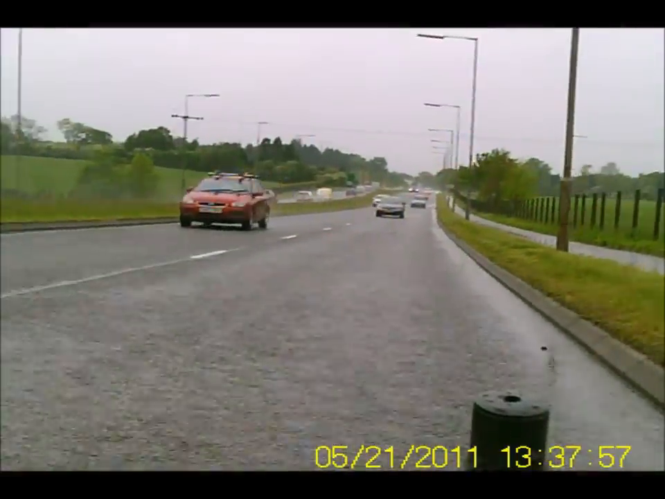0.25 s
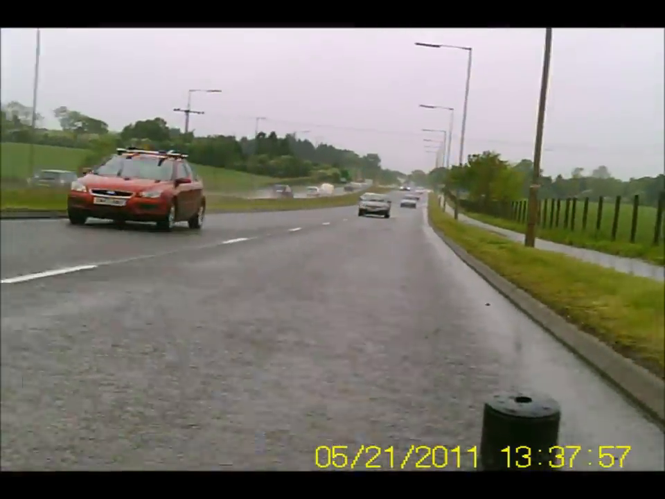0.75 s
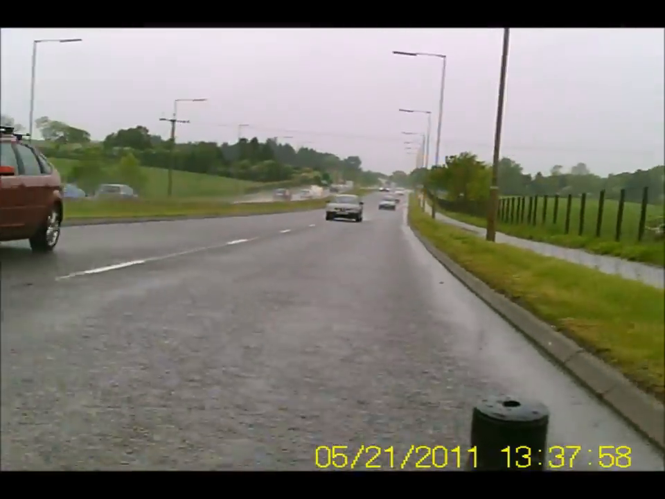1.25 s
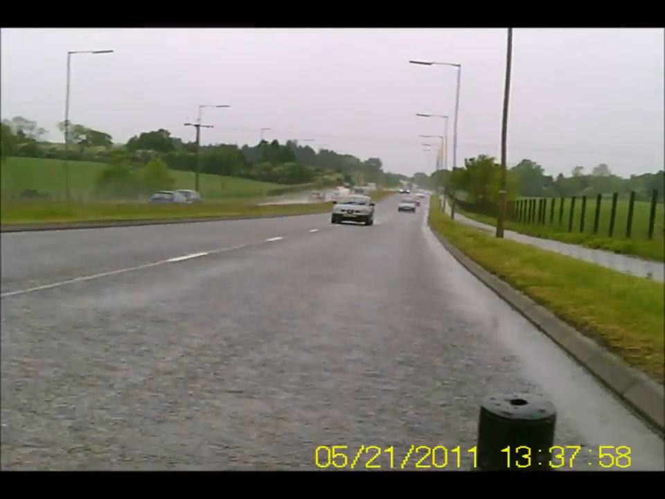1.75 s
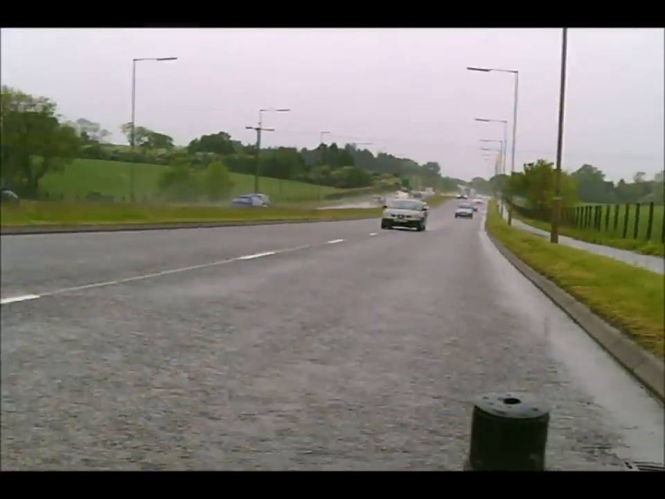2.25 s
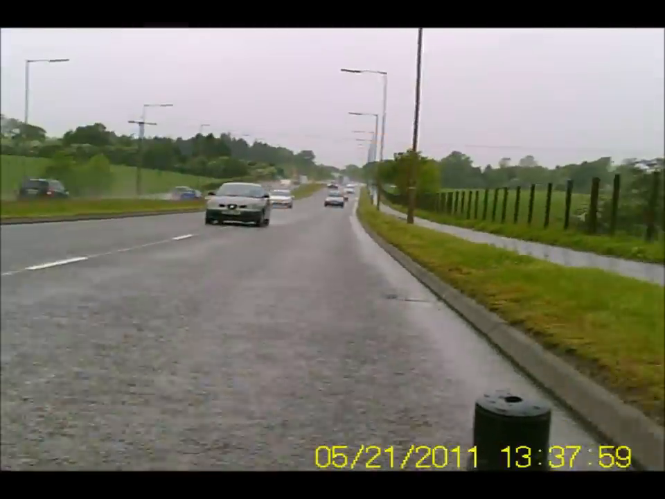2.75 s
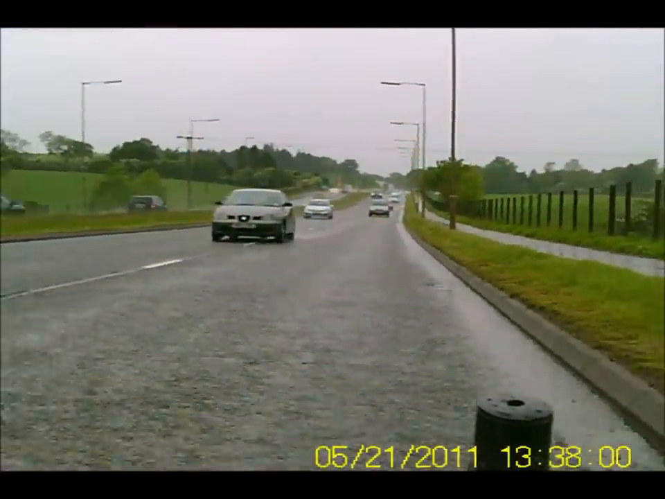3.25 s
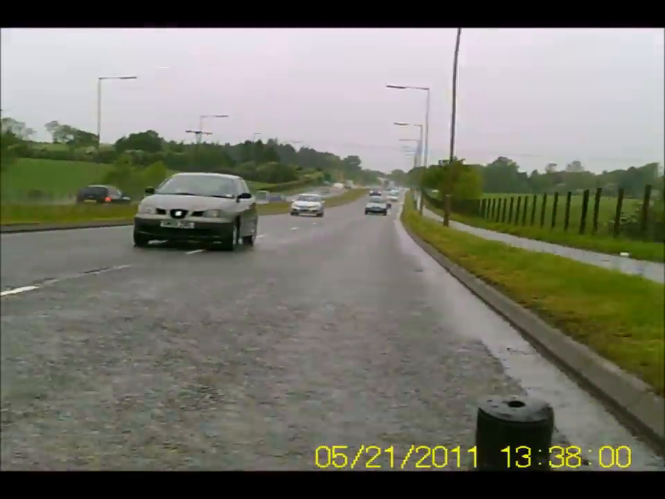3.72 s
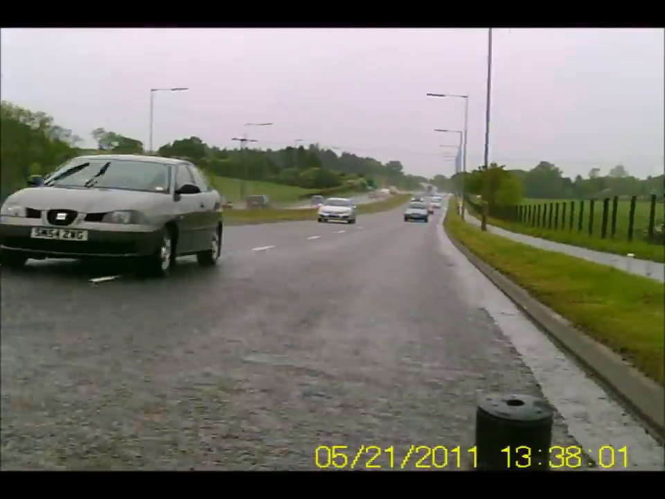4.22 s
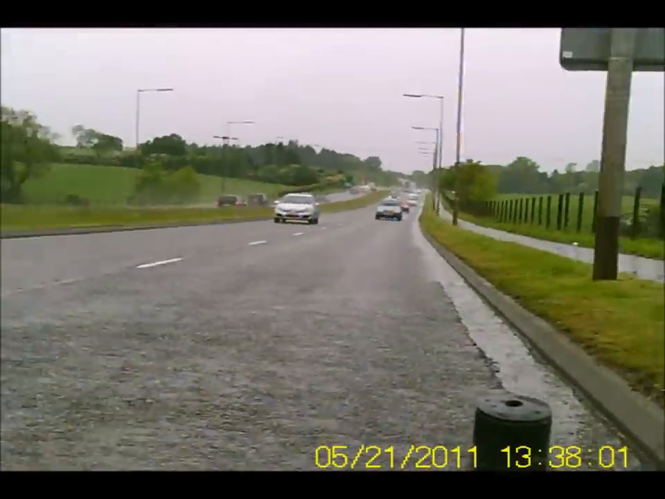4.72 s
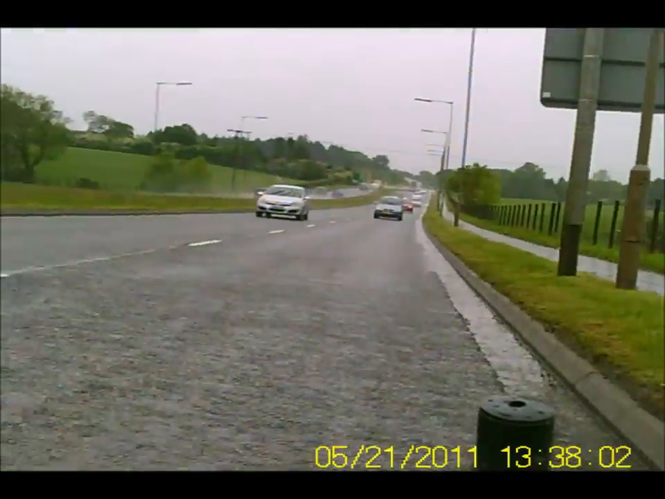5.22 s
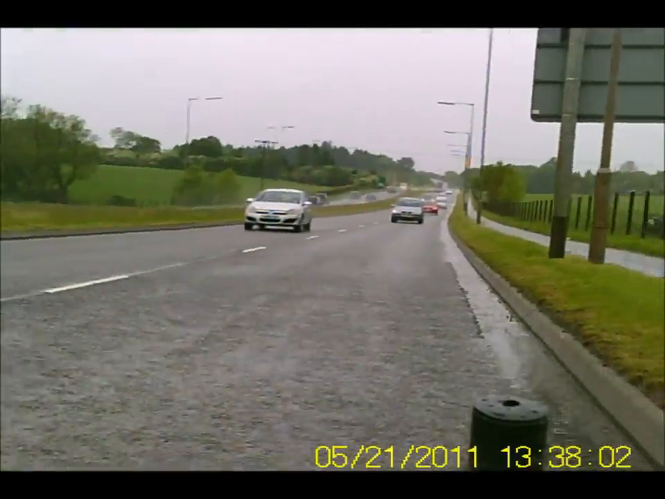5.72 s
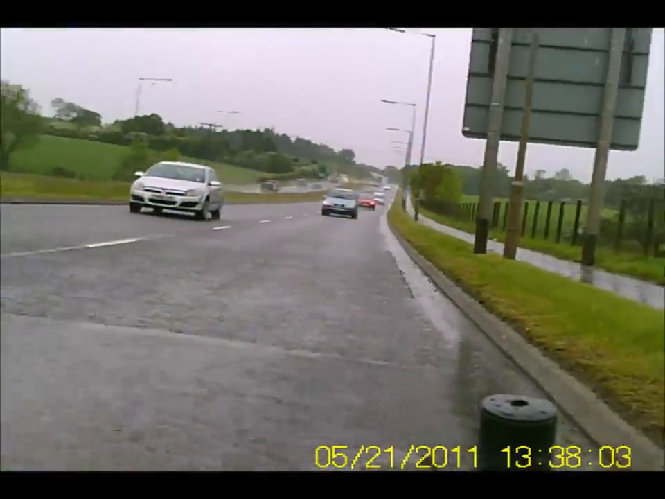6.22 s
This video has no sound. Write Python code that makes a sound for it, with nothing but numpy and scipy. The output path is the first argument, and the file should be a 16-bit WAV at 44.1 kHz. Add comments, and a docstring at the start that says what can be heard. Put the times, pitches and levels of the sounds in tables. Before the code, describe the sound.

Wind buffets and thumps a small camera microphone on a bicycle, while its housing rattles over rough asphalt and cars pass with wet tyre roar.

```python
"""Wind buffets and rushes over the microphone of a small camera that rides on a bicycle along a wet main road.
The camera knocks in its mount: each jolt gives a low push and a dull clunk, and rings the plastic housing's modes.
The housing chatters on the asphalt grain, the clamp snaps twice over, and a few drops plop as ringing bubbles.
Oncoming cars pass as bands of tyre roar and spray hiss that swell with nearness; fine wet hiss swishes
in short bursts of droplet grains, and the electronics whine faintly in steady tones."""
import sys
import numpy as np
from scipy import signal
from scipy.fft import rfft, irfft, next_fast_len
from scipy.io import wavfile
from scipy.ndimage import uniform_filter1d, map_coordinates

SR = 44100
rng = np.random.default_rng(int(sys.argv[2]) if len(sys.argv) > 2 else 0)


def store_wav(level_fs):
    """Save 16-bit WAV to argv[1]."""
    pcm = np.round(np.clip(np.atleast_2d(level_fs), -1, 1) * 32767)
    wavfile.write(sys.argv[1], SR, pcm.T.astype(np.int16))


N = 285327

# edges between the clunk, hollow, middle and sharp parts of a knock, then the top edge: [f/Hz]
REGISTER_EDGES_HZ = [300, 1500, 3700, 7300, 10800]
CLUNK_TOP_HZ = 833  # the mount is too soft to pass more
# stretches of rough asphalt: [start t/s, end t/s, small knocks per s, rise of the chatter level/dB]
ROUGH_STRETCHES = [(1.156, 2.647, 4, 0), (3.252, 4.884, 8.7, 2.5)]


def amp(db):
    """Decibels to gain."""
    return 10 ** (np.asarray(db) / 20)


def unit(x):
    """x scaled to rms 1."""
    return x / np.sqrt(np.mean(x ** 2) + 1e-20)


def curves(rows):
    """One value per sample for each column after the time."""
    knot_s, *columns = np.transpose(rows)
    return [np.interp(np.arange(N) / SR, knot_s, column) for column in columns]


def wobble(rate):
    """A smooth random curve around 0, rate knots a second."""
    knots = rng.standard_normal(int(N * rate / SR) + 4)
    return map_coordinates(knots, [np.arange(N) * rate / SR])


def bell(s, half_s):
    """A bell-shaped rise and fall around time s, top 1."""
    return np.exp(-.5 * ((np.arange(N) / SR - s) / half_s) ** 2)


def filtered(x, response):
    """x times a response of frequency."""
    m = next_fast_len(N + SR // 2)
    return irfft(rfft(x, m) * response(np.fft.rfftfreq(m, 1 / SR)), m)[:N]


def band(x, low_hz, high_hz):
    """The part of x between two frequencies, rms 1."""
    sos = signal.butter(3, [low_hz, high_hz], "bandpass", fs=SR, output="sos")
    return unit(signal.sosfilt(sos, x))


def noise(spectrum):
    """Noise of rms 1 with the colour of [f/Hz, level/dB] points."""
    f, db = np.transpose(spectrum)

    def colour(hz):
        return amp(np.interp(np.log(hz + 1), np.log(f), db))

    return unit(filtered(rng.standard_normal(N), colour))


def grains(rate, spread_db):
    """Tiny impacts at random times, most weak and a few strong, rms 1."""
    hit = rng.random(N) < rate / SR
    size = amp(spread_db * np.minimum(rng.exponential(size=N), np.pi))
    return unit(hit * size * rng.choice([-1, 1], N))


def add(track, s, sound):
    """Mix a sound into the track from time s."""
    part = track[max(round(s * SR), 0):][:len(sound)]
    part += sound[:len(part)]


def swells(rows, source):
    """Bands of the source that rise and fall in bell shapes."""
    track = np.zeros(N)
    for s, half_s, db, centre_hz, octaves in rows:
        def bell_band(hz):
            return np.exp(-.5 * (np.log2((hz + 1) / centre_hz) / octaves) ** 2)

        track += amp(db) * bell(s, half_s) * unit(filtered(source, bell_band))
    return track


def push(t, half_s):
    """One dip of pressure in the middle of the times t, depth 1, with an overshoot on either side."""
    u = (t - t.mean()) / half_s
    return (2 * u * u - 1) * np.exp(-u * u)


def contact(t, rise_s):
    """Two rough surfaces touch: a burst of noise that swells and dies at once."""
    return rng.standard_normal(len(t)) * t / rise_s * np.exp(1 - t / rise_s)


def chatter(t, rise_s):
    """A contact that bounces once, more weakly, after a random flight."""
    shortest_s, longest_s, bounce_db = 0.0015, 0.004, -11
    flight = round(rng.uniform(shortest_s, longest_s) * SR)
    bounce = np.pad(contact(t, rise_s), (flight, 0))[:len(t)]
    return contact(t, rise_s) + amp(bounce_db) * bounce


def housing(hz, tilt_db=0):
    """Response of the plastic shell: a sum of resonant modes, tilted by tilt_db per octave."""
    # modes of the shell: [f/Hz, width/Hz, level/dB before the tilt]
    modes = [(1941, 150, 7), (2910, 240, -1.5), (4490, 167, -1), (6530, 250, -5.5), (8360, 500, 2),
             (9850, 110, -14.5)]
    lowest_hz = modes[0][0]
    response = 0
    for centre, width, db in modes:
        gain = amp(db + tilt_db * np.log2(centre / lowest_hz))
        damping = 1j * hz * width
        response = response + gain * damping / (centre * centre - hz * hz + damping)
    return response


def struck(touch, crack_db):
    """The housing answers a contact with its modes, over the dry crack of the contact itself."""
    # the pitch of the modes shifts with the place of contact
    hz = np.fft.rfftfreq(len(touch), 1 / SR) * (1 + 0.015 * rng.standard_normal())
    return irfft(rfft(touch) * (housing(hz) + amp(crack_db)), len(touch))


def bumps():
    """The brief change in dB that bumps in the road give the rush; the tyre roar takes a share of it."""
    # the bicycle rides over a bump: [t/s, rise of the rush level/dB]
    bump_rows = [(0.647, 7), (0.693, 5), (0.835, -1), (1.151, 1.5), (1.94, 0.5), (2.275, 0.5), (3.28, 9),
                 (3.371, 10.5), (4.431, 13), (5.281, 7.5), (5.84, 7), (6.38, 6)]
    return sum(rise_db * bell(s, half_s=0.0078) for s, rise_db in bump_rows)


def roughness_db():
    """How much the asphalt under the wheels raises the chatter of the housing, with softened edges."""
    t, steps = np.arange(N) / SR, np.zeros(N)
    for start, end, _, rise_db in ROUGH_STRETCHES:
        steps += np.where((t > start) & (t < end), rise_db, 0.)
    return uniform_filter1d(steps, size=SR // 10)


def whine():
    """Thin steady tones and a faint hiss from the camera's circuits."""
    # tones of the electronics: [f/Hz, rms level/dB]
    tone_rows = [(3893, -99.5), (5600, -79.5), (6201, -87), (6800, -88), (7400, -79), (9600, -96)]
    # colour of the circuit hiss: [f/Hz, relative level/dB]
    circuit_colour = [(300, -0.5), (4000, 5), (7000, -0.5), (10000, -4), (11500, -28.5)]
    t, tones = np.arange(N) / SR, np.zeros(N)
    for hz, db in tone_rows:
        tones += np.sqrt(2) * amp(db) * np.sin(2 * np.pi * (hz * t + rng.random()))
    return tones + amp(-71.5) * noise(circuit_colour)


def drops(glide, life_s, attack_s):
    """A drop plops near the microphone: a tiny bubble rings for a few cycles while its pitch rises."""
    # plops: [t/s, level/dB before the envelope, starting f/Hz]
    plops = [(3.251, -30, 1040), (3.423, -22.5, 636), (3.859, -30, 820), (6.171, -29, 850)]
    track, t = np.zeros(N), np.arange(SR // 40) / SR
    decay = np.exp(-t / life_s)
    envelope = decay * (1 - np.exp(-t / attack_s))
    for s, db, hz in plops:
        pitch = hz * (1 + glide * (1 - decay))
        add(track, s, amp(db) * np.sin(2 * np.pi * np.cumsum(pitch) / SR) * envelope)
    return track


def swishes():
    """Fine wet hiss, from puddles and passing tyres: short swells of droplets, partly through the shell."""
    # swishes of wet hiss: [t/s, half length/s, level/dB, centre f/Hz, width/octaves]
    swish_rows = [(0.29, 0.038, -43.5, 950, 0.39), (0.3, 0.041, -51, 3240, 0.62),
                  (1.17, 0.03, -58, 3400, 0.33), (1.69, 0.16, -60.5, 3500, 0.26),
                  (4.41, 0.11, -60.5, 2700, 0.49)]
    droplets = grains(rate=5400, spread_db=6.0) * amp(2.2 * wobble(110))
    return swells(swish_rows, filtered(droplets, lambda hz: 0.21 + housing(hz)))


def wet_tyres(rough_gain, bump_gain, roar_falloff, spray_falloff):
    """Tread roars on asphalt, louder as a car draws near; flung droplets hiss as each car passes."""
    # oncoming cars: [abreast t/s, distance across the road/m, roar level/dB, spray level/dB, spray lag t/s]
    car_rows = [(1.88, 13.2, -47, -65.5, 0), (4.98, 3.8, -41, -55, 0.34)]
    # colour of the tyre roar: [f/Hz, relative level/dB]
    roar_colour = [(300, -22.5), (650, 0.5), (920, 4.5), (1150, -2.5), (1550, -40), (1900, -14.5),
                   (2550, -37.5), (3200, -20.5), (4000, -32), (8000, -53.5)]
    # colour of the spray hiss: [f/Hz, relative level/dB]
    hiss_colour = [(1000, 14), (1500, 18.5), (1900, 26.5), (2500, 6.5), (3200, 18.5), (4000, 4), (4750, 17),
                   (5700, 0.5), (6500, 13), (7250, 3), (7900, 9.5), (9300, 3), (10350, 7), (11200, -8.5)]
    t = np.arange(N) / SR
    closing_m_per_s = 14.3  # speed of a car against the bicycle

    def nearness(across_m, abreast_s):
        return across_m / np.hypot(across_m, closing_m_per_s * (t - abreast_s))

    # the bicycle's own tyres roar throughout
    own_db = -59 + rough_gain * roughness_db() + bump_gain * bumps()
    roar_power, spray = amp(own_db) ** 2, 0
    for s, across_m, roar_db, spray_db, lag_s in car_rows:
        car_roar = amp(roar_db) * nearness(across_m, s) ** roar_falloff
        roar_power = roar_power + car_roar ** 2
        spray = spray + amp(spray_db) * nearness(across_m, s + lag_s) ** spray_falloff
    roar = np.sqrt(roar_power) * amp(0.85 * wobble(13) + 1.4 * wobble(90)) * noise(roar_colour)
    return roar + spray * amp(2.2 * wobble(35)) * noise(hiss_colour)


def snaps(swing_s, swing_db, contact_s, crack_db, body_db, return_db, clunk_s):
    """The camera rocks in its clamp: a dry snap ends the swing, another with a clunk as it falls back."""
    # double snaps: [first snap t/s, reference level/dB for all their parts]
    snap_rows = [(0.5252, -51), (0.5585, -47.5)]
    # the clamp itself rings in this band: [low and high f/Hz]
    clamp_band_hz = [2500, 5070]
    return_s, clunk_db = 0.0065, 12  # from first to second snap; clunk against the first snap
    track, t = np.zeros(N), np.arange(SR // 50) / SR
    clunk_edge, hollow_edge, _, _, top_edge = REGISTER_EDGES_HZ
    for s, db in snap_rows:
        for when, level_db in (s, db), (s + return_s, db + return_db):
            shell = band(struck(contact(t, contact_s), crack_db), hollow_edge, top_edge)
            clamp = amp(body_db) * band(contact(t, contact_s), *clamp_band_hz)
            add(track, when, amp(level_db) * (shell + clamp))
        add(track, s - t.mean(), amp(db + swing_db) * push(t, swing_s))
        clunk = band(contact(t, clunk_s), clunk_edge, CLUNK_TOP_HZ)
        add(track, s + return_s - clunk_s, amp(db + clunk_db) * clunk)
    return track


def small_knocks(hollow_db, middle_db, sharp_db, jolt_db, size_db):
    """Weak knocks of random size scattered over the rough stretches."""
    levels_db = np.array([hollow_db, middle_db, sharp_db, jolt_db])
    rows = []
    for start, end, rate, _ in ROUGH_STRETCHES:
        for s in np.arange(start, end, 1 / rate):
            rows.append((s + rng.random() / rate, *(levels_db + size_db * rng.standard_normal())))
    return rows


def knocks(contact_s, scrape_lag_s, crack_db, hollow_gain_db, middle_gain_db, sharp_gain_db,
           thump_s, thump_db, clunk_s, clunk_db):
    """A jolt pushes and clunks the mount; the shell bumps hollowly, then scrapes in its upper modes."""
    # the housing knocks in its mount, levels before the gains of each part:
    # [t/s, hollow level/dB, middle level/dB, sharp level/dB, jolt of the mount level/dB]
    knock_rows = [(0.4931, -60, -69, -63, -44), (0.7735, -52.5, -66, -53.5, -29.5),
                  (0.8343, -67, -69, -80, -33.5), (1.1935, -57, -67, -83, -34), (1.286, -67, -72, -64, -52),
                  (1.3578, -62, -80, -81, -37), (1.4768, -52.5, -65, -64.5, -49),
                  (1.6768, -49, -63, -72, -40), (1.7621, -50, -61, -68, -35),
                  (1.9677, -50, -69, -60, -28.5), (2.0129, -48.5, -65, -71, -48),
                  (2.0518, -53, -63, -62, -46), (2.0705, -62, -68, -57.5, -29),
                  (2.1411, -68, -69, -62, -34), (2.341, -55.5, -60, -59, -40),
                  (2.3726, -50.5, -65, -73, -35), (2.4061, -52, -67, -71, -49),
                  (2.4236, -49.5, -61, -58, -32), (2.491, -45.5, -61, -57, -35),
                  (2.5496, -51, -63, -67, -54), (2.5829, -64, -69, -58.5, -34),
                  (2.7382, -50, -60, -69, -43), (2.8867, -52, -66, -70, -45), (3.2288, -57, -61, -57, -36),
                  (3.2608, -57, -57, -50.5, -35), (3.2746, -46.5, -53, -65, -29.5),
                  (3.2864, -52, -63, -59, -36), (3.2999, -49, -60, -69, -34.5),
                  (3.3276, -66, -56, -56, -32.5), (3.3599, -65, -75, -65, -41),
                  (3.3722, -44.5, -49, -47, -30), (3.4377, -51.5, -59, -76, -47),
                  (3.5146, -47, -63, -69, -34), (3.5165, -47, -67, -59, -34), (3.5456, -52, -64, -70, -38),
                  (3.5592, -48, -58, -56, -40), (3.6259, -49.5, -71, -79, -31.5),
                  (3.694, -43.5, -56, -60, -35.5), (3.7529, -58, -67, -68, -43),
                  (3.7959, -48, -61, -62, -36), (3.8396, -53, -57, -62, -39),
                  (3.8704, -48, -67, -68, -33.5), (3.9432, -64, -66, -59, -52),
                  (4.0466, -46.5, -52, -48.5, -41), (4.0688, -69, -57, -50, -49),
                  (4.08, -41.5, -65, -66, -45), (4.1536, -50, -59, -69, -47), (4.2348, -50, -61, -74, -51),
                  (4.3092, -50, -58, -65, -44), (4.3525, -53, -66, -82, -44), (4.3901, -50, -64, -70, -36),
                  (4.4077, -49, -72, -77, -39), (4.426, -46, -61, -60, -33.5),
                  (4.4333, -43, -55, -53.5, -33), (4.4434, -60, -59, -69, -50),
                  (4.4673, -46.5, -59, -63, -31), (4.5178, -47.5, -63, -76, -45),
                  (4.6012, -64, -59, -68, -39), (4.6211, -66, -69, -64, -32.5),
                  (4.6803, -45.5, -57, -64, -32.5), (4.7278, -48.5, -56.5, -55, -35.5),
                  (4.8614, -63, -59, -59, -33), (4.8723, -44, -66, -69, -33.5),
                  (4.9679, -66, -77, -80, -41), (5.0181, -49.5, -65, -66, -39),
                  (5.0665, -51, -73, -73, -45), (5.1579, -63, -69, -62, -45), (5.265, -51, -72, -78, -48),
                  (5.6965, -55, -63, -64, -56), (5.8356, -47.5, -60, -62, -28.5),
                  (5.8442, -52, -61, -63, -49), (6.1916, -47, -72, -84, -32)]
    weak_rows = small_knocks(hollow_db=-59, middle_db=-74, sharp_db=-81, jolt_db=-51.5, size_db=2.0)
    track, t = np.zeros(N), np.arange(SR // 50) / SR
    clunk_edge, hollow_edge, middle_edge, sharp_edge, top_edge = REGISTER_EDGES_HZ
    for s, hollow_db, middle_db, sharp_db, jolt_db in list(knock_rows) + weak_rows:
        bump = struck(chatter(t, contact_s), crack_db)
        scrape = struck(chatter(t, contact_s), crack_db)
        hollow = amp(hollow_db + hollow_gain_db) * band(bump, hollow_edge, middle_edge)
        middle = amp(middle_db + middle_gain_db) * band(scrape, middle_edge, sharp_edge)
        sharp = amp(sharp_db + sharp_gain_db) * band(scrape, sharp_edge, top_edge)
        clunk = amp(jolt_db + clunk_db) * band(contact(t, clunk_s), clunk_edge, CLUNK_TOP_HZ)
        add(track, s, hollow)
        add(track, s + scrape_lag_s, middle + sharp)
        add(track, s - clunk_s, clunk)
        # the push peaks as the housing makes contact
        add(track, s - t.mean(), amp(jolt_db + thump_db) * push(t, thump_s))
    return track


def housing_buzz(shake, dull_db):
    """The grain of the asphalt keeps the housing chattering, mostly in its lower modes."""
    drive = grains(rate=380, spread_db=7.0) + 0.92 * rng.standard_normal(N)
    drive = drive * amp(3.4 * shake)
    buzz = unit(filtered(drive, lambda hz: housing(hz, dull_db)))
    return amp(-58.5 + roughness_db()) * buzz  # dB on smooth asphalt, plus the rise


def eddies():
    """Each large eddy sucks at the port once; the pressure overshoots before and after."""
    # thumps: [t/s, peak level/dB, half length/s]
    thumps = [(0.2, -10, 0.0035), (0.644, -17, 0.0057), (0.714, -10.5, 0.0023), (1.569, -6.5, 0.0052),
              (1.616, -9.5, 0.0039), (2.045, -5.5, 0.005), (2.328, -14, 0.006), (3.242, -8, 0.015),
              (3.282, -6.5, 0.0076), (3.44, -8.5, 0.0061), (3.556, -6.5, 0.0052), (3.703, -10.5, 0.0088),
              (3.794, -9.5, 0.0054), (4.095, -7, 0.0045), (4.202, -13.5, 0.0082), (4.233, -18, 0.0054),
              (4.755, -12, 0.0085), (4.858, -9.5, 0.014), (5.008, -13, 0.0074), (5.287, -14, 0.0043),
              (5.894, -10.5, 0.013), (6.382, -19, .003)]
    track, t = np.zeros(N), np.arange(SR // 10) / SR
    for s, db, half_s in thumps:
        add(track, s - t.mean(), amp(db) * push(t, half_s))
    return track


def wind(shake):
    """Eddies thump on the microphone port, under a smoother rush that leaps at bumps and broad low swells."""
    # strength of the airflow: [t/s, buffet level/dB before a 0.2 dB cut, rush level/dB before the bumps]
    airflow = [(0.0, -19, -34.5), (0.18, -20.5, -34), (0.32, -21, -27), (0.47, -21.5, -36),
               (0.61, -24, -36), (0.73, -18, -34.5), (0.83, -22.5, -30), (0.93, -24, -36.5),
               (1.2, -20.5, -32.5), (1.42, -21.5, -35), (1.57, -13.5, -30.5), (1.8, -20, -33.5),
               (2.04, -18, -32), (2.2, -22.5, -35.5), (2.58, -21.5, -35.5), (2.64, -26.5, -36),
               (2.8, -27, -39), (2.94, -21, -34.5), (3.1, -26, -36.5), (3.27, -20, -35),
               (3.42, -18.5, -34.5), (3.78, -18.5, -31.5), (3.98, -19.5, -35), (4.22, -17.5, -32),
               (4.42, -16.5, -35), (4.54, -18, -34), (4.83, -25.5, -34), (4.92, -17.5, -32),
               (5.2, -21, -35), (5.55, -18.5, -36), (5.78, -22.5, -37), (5.95, -17.5, -35),
               (6.12, -24, -37.5), (6.32, -21.5, -34.5), (6.47, -15, -35.5)]
    # colour of the buffeting: [f/Hz, relative level/dB]
    buffet_colour = [(12, -4), (27, 4.5), (40, -2), (62, -5.5), (88, -3), (115, -12), (170, -18),
                     (280, -29.5), (500, -52.5), (1200, -93)]
    # colour of the rush: [f/Hz, relative level/dB]
    rush_colour = [(100, -5), (220, 1.5), (320, 0.2), (450, 0.5), (650, -3), (850, -12), (1100, -19.5),
                   (1450, -28), (2500, -31.5), (5000, -55)]
    # broad low swells of rushing air and of tyre roar:
    # [t/s, half length/s, level/dB, centre f/Hz, width/octaves]
    low_swells = [(0.3, 0.083, -33.5, 186, 0.38), (0.715, 0.026, -28.5, 192, 0.46),
                  (1.62, 0.07, -31.5, 150, 1.17), (1.68, 0.26, -41.5, 510, 0.38),
                  (2.01, 0.1, -32, 160, 0.98), (1.98, 0.12, -44, 810, 0.4), (3.285, 0.018, -25, 203, 0.57),
                  (5.05, 0.16, -39, 400, 0.54), (6.32, 0.14, -44.5, 410, 0.6)]
    buffet_db, rush_db = curves(airflow)
    buffet = amp(buffet_db - 0.2) * unit(noise(buffet_colour) * amp(1.9 * wobble(22)))
    flutter = amp(1.0 * shake + 2.35 * wobble(130))
    rush = amp(rush_db + bumps()) * unit(noise(rush_colour) * flutter)
    rough_noise = rng.standard_normal(N) * amp(3.0 * wobble(90))
    return buffet + eddies() + rush + swells(low_swells, rough_noise)


def scene():
    """All layers together; the same shaking roughens the airflow and drives the housing."""
    shake = wobble(45)
    plops = drops(glide=1.06, life_s=0.0013, attack_s=0.00055)
    tyres = wet_tyres(rough_gain=2.9, bump_gain=0.69, roar_falloff=1.53, spray_falloff=1.42)
    rocking = snaps(swing_s=0.004, swing_db=37.0, contact_s=0.0011, crack_db=-1,
                    body_db=-4.0, return_db=-3.0, clunk_s=0.0011)
    rattle = knocks(contact_s=0.00071, scrape_lag_s=0.0004, crack_db=-14,
                    hollow_gain_db=0.04, middle_gain_db=-1.3, sharp_gain_db=-0.4,
                    thump_s=0.0028, thump_db=13, clunk_s=0.001264, clunk_db=-4.5)
    buzz = housing_buzz(shake, dull_db=-12.0)
    mix = whine() + plops + swishes() + tyres + rocking + rattle + buzz + wind(shake)
    return mix[None]


def record(dry):
    """The microphone rounds off the biggest buffets, and a steep band limit closes the treble."""
    limit, top_hz = 0.62, 10650
    rounded = dry[0] / (1 + (dry[0] / limit) ** 4) ** .25
    return filtered(rounded, lambda hz: 1 / np.sqrt(1 + (hz / top_hz) ** 120))[None]


dry = scene()
out = record(dry)
store_wav(out)
```